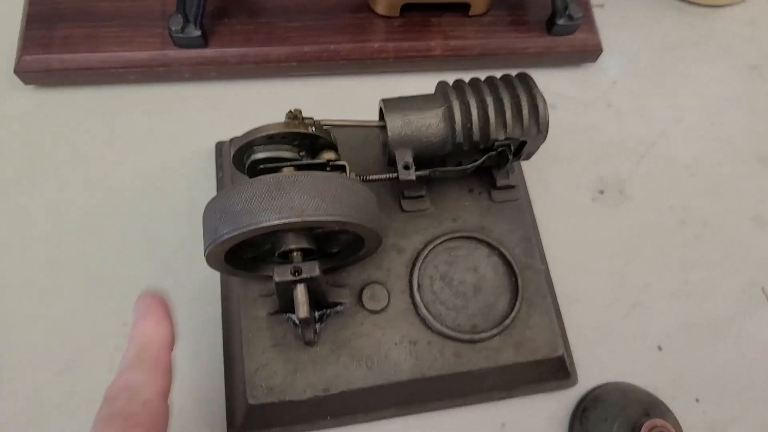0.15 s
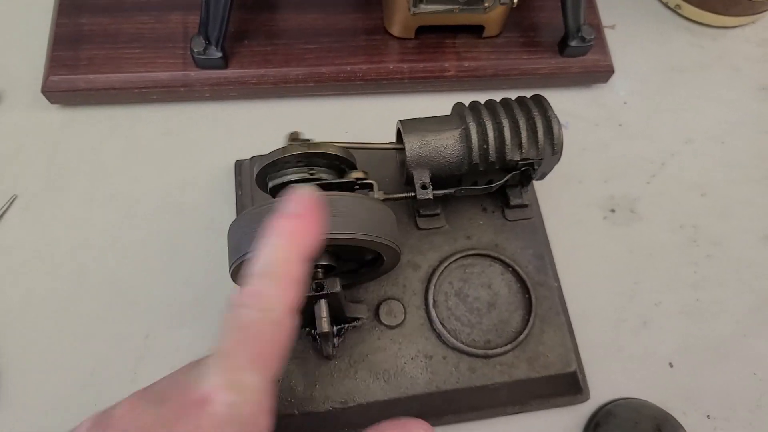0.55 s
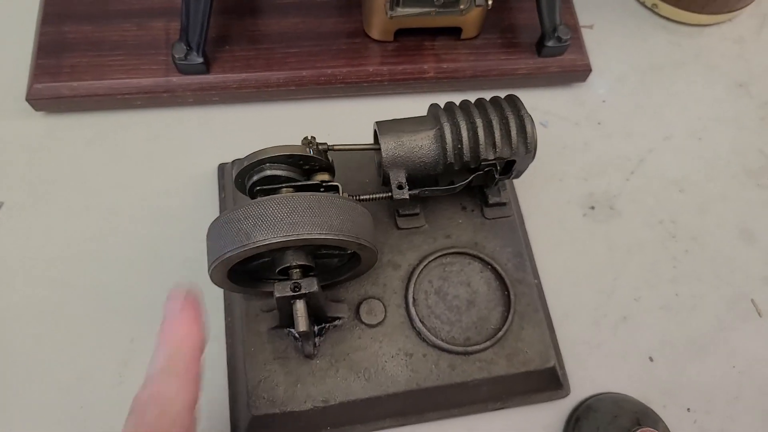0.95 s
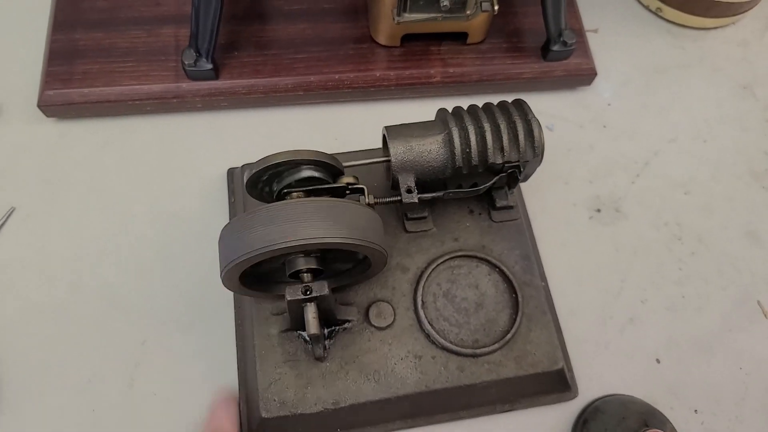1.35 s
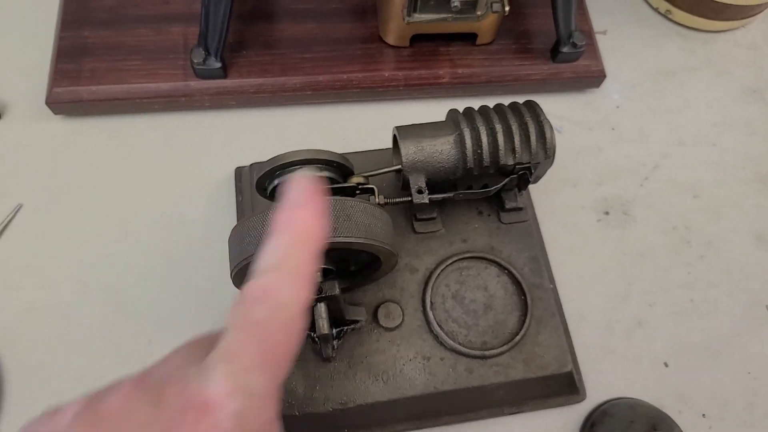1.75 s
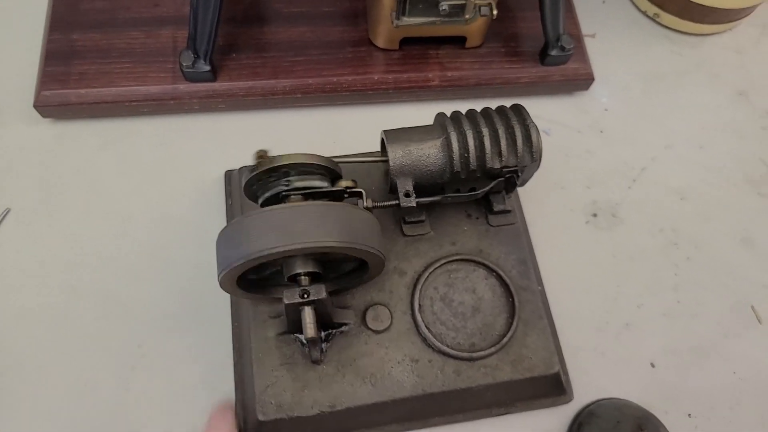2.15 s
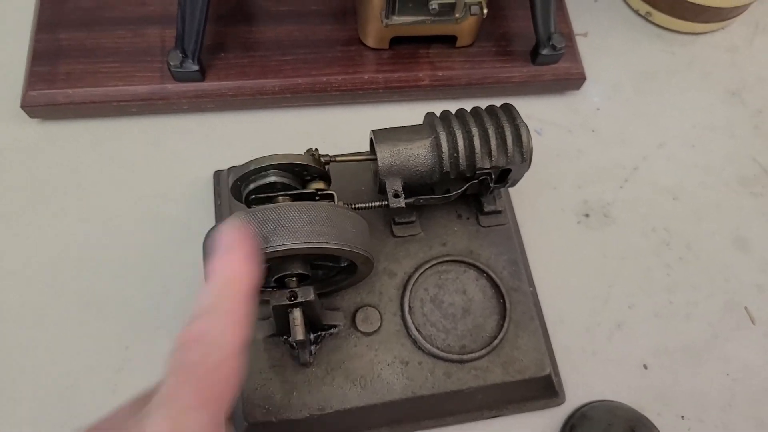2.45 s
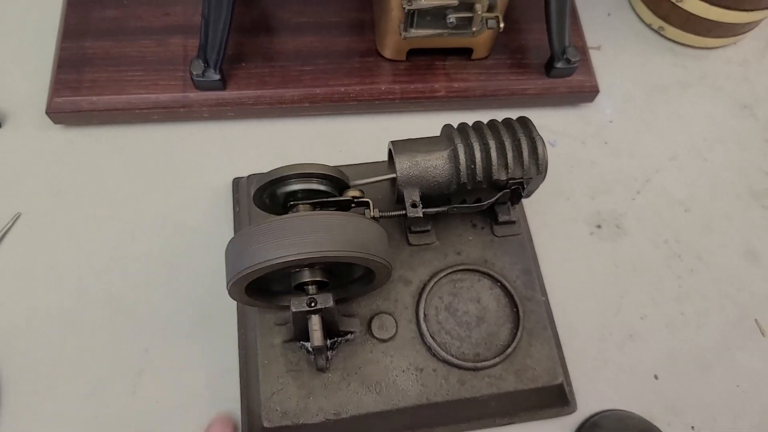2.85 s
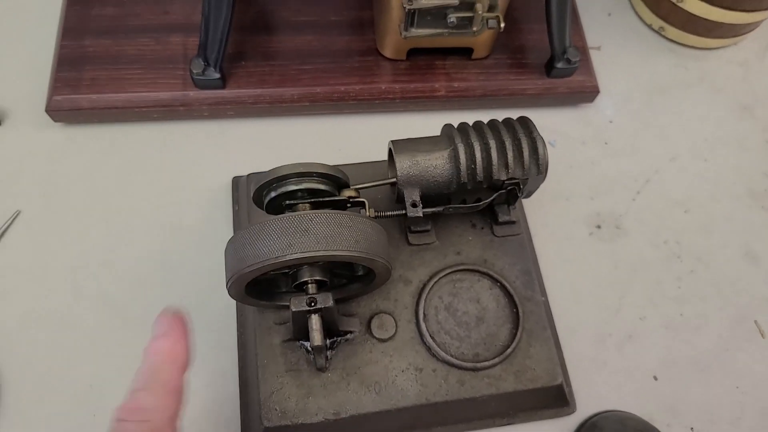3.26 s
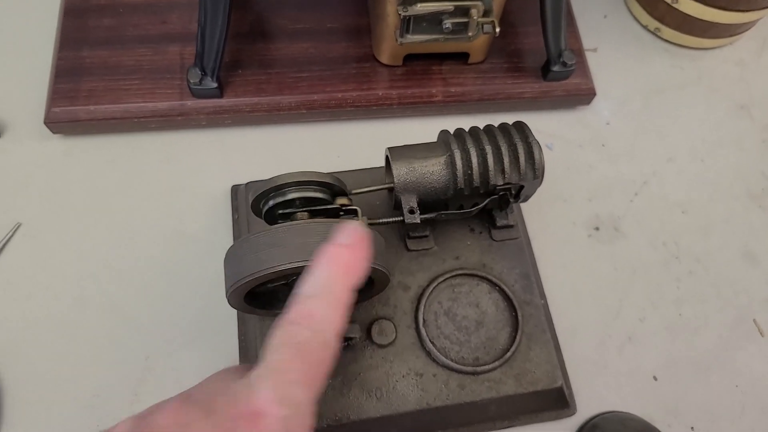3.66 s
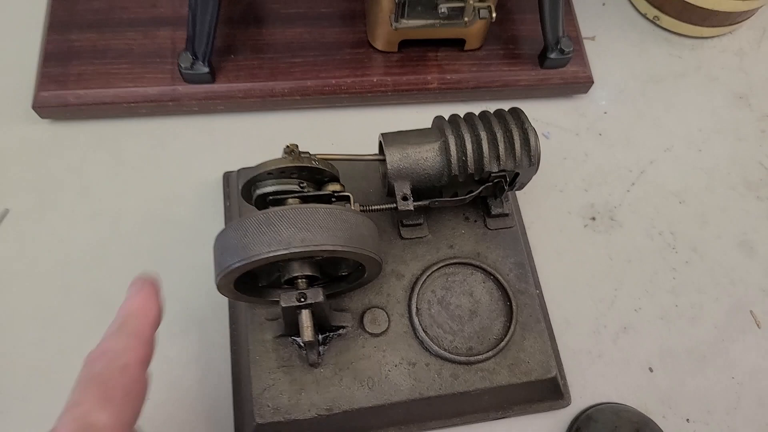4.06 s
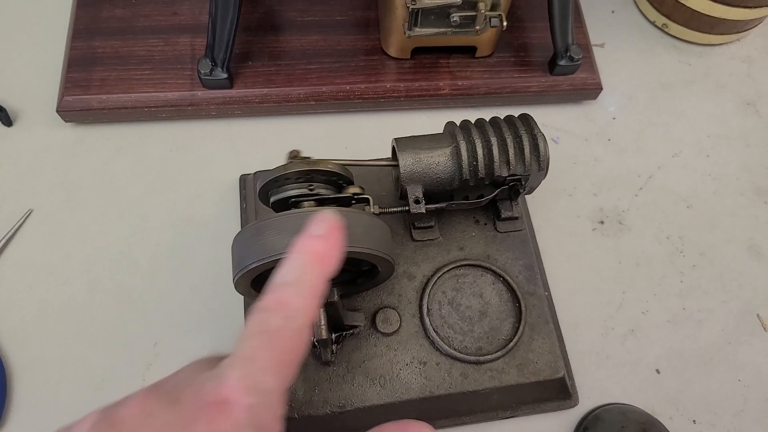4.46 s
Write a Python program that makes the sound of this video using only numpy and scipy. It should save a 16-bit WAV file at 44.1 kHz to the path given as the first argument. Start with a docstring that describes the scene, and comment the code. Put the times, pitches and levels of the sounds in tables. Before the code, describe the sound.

A small metal model engine, flicked by hand, gives a few hollow pops and sharp metallic clicks with short rings.

```python
"""A small, cold model vacuum engine gives hollow pops as a finger flicks its flywheel round.
Each pop is a puff of air that sets the cylinder ringing. The valve gear chatters and clacks, the metal
rings on, and loose joints tick as the wheel swings back. Skin brushes the ridged rim, the dry piston
rubs, and the base rocks on the table. A small room echoes it all, over a low rumble and a thin hiss."""
import sys
import numpy as np
from scipy import signal
from scipy.fft import rfft, irfft, next_fast_len
from scipy.io import wavfile

SR = 44100
rng = np.random.default_rng(int(sys.argv[2]) if len(sys.argv) > 2 else 0)


def master_out(mix):
    """Clip the mix to full scale and print it as 16-bit PCM to the path in sys.argv[1]."""
    frames = np.transpose(np.atleast_2d(mix))
    ceiling = np.clip(frames, -1, 1)
    pcm = np.round(ceiling * 32767).astype(np.int16)
    wavfile.write(sys.argv[1], SR, pcm)


N = 203197
TIME = np.arange(N) / SR


def amp(db):
    """Turn decibels into a number to multiply by."""
    return 10 ** (np.asarray(db) / 20)


def panned(db):
    """Left and right gains; a positive pan makes the left side louder."""
    return amp(np.array([[.5], [-.5]]) * db)


def at_hz(table, hz, column=1):
    """Read between a table's rows, spacing the frequencies by octaves."""
    table = np.array(table)
    return np.interp(np.log(np.maximum(hz, 1)), np.log(table[:, 0]), table[:, column])


def add(out, s, sound):
    """Mix a short sound in at s seconds."""
    start = int(np.clip(s * SR, 0, N - 1))
    out[:, start:start + sound.shape[1]] += sound[:, :N - start]


def white_noise(alike, size):
    """Stereo noise whose two sides are unrelated (alike=0) up to identical (alike=1)."""
    mid, side = rng.standard_normal((2, size))
    return np.sqrt((1 + alike) / 2) * mid + np.sqrt((1 - alike) / 2) * side * [[1], [-1]]


# Where the engine's hissy sounds sit between left and right: f/Hz, pan/dB
TREBLE_PAN = [(1500, -13), (3000, 1.5), (5000, 3), (7500, 12), (16000, 10)]
def noise(spectrum, alike, pan=None):
    """Steady stereo noise of strength 1, with its tone shaped by a table."""
    size = next_fast_len(N)
    hz = np.fft.rfftfreq(size, 1 / SR)
    gain = amp(at_hz(spectrum, hz)) * (panned(at_hz(pan, hz)) if pan else 1)
    shaped = irfft(rfft(white_noise(alike, size)) * gain, size)[:, :N]
    return shaped / shaped.std()


def wander(per_s):
    """A random curve around zero that glides to a new value so many times a second."""
    return np.interp(TIME * per_s, np.arange(5000), rng.standard_normal(5000))


def burst(s, rise, t60):
    """A loudness curve that swells to 1 at time s, then fades by 60 dB in t60 seconds."""
    return amp(-60 * np.minimum(np.maximum((s - TIME) / rise, (TIME - s) / t60), 2))


def ring(tones, contact=.0001, size=SR // 3):
    """A struck object rings with fading tones; a longer contact (in seconds) softens the start."""
    t = TIME[:size]
    sound = 0
    for k, (hz, db, t60, pan) in enumerate(tones):
        fade = amp(db + rng.standard_normal() - 60 * t / t60)
        sound += (-1) ** k * panned(pan) * fade * np.sin(2 * np.pi * hz * t)
    return (1 - np.exp(-(t / contact) ** 2)) * sound


# Tone of the low rumble: f/Hz, level/dB
RUMBLE = [(15, -37), (25, 0.5), (81, 3), (214, -9.5), (265, -10), (781, -29.5), (1000, -38), (1300, -62),
          (2200, -120)]
# Tone of the thin hiss: f/Hz, level/dB
THIN_HISS = [(900, 5), (1300, 5.5), (2300, -3), (3400, 2), (4000, -10.5), (4900, -8.5), (5600, -2.5),
             (6400, -19.5), (8000, -30), (13000, -20), (16000, -20.5)]
def background(rumble_db=-58, wander_db=5, hiss_db=-67.5):
    """A quiet rumble wavers under a steady, thin hiss."""
    rumble = amp(rumble_db + wander_db * wander(per_s=9)) * noise(RUMBLE, alike=.97)
    return rumble + amp(hiss_db) * noise(THIN_HISS, alike=.2)


# Low notes that linger between the walls: f/Hz, level/dB, t60/s, pan/dB
ROOM_TONES = [(84.3, -59, 0.22, 0.19), (102.6, -60, 0.88, 0.053), (137.3, -51.5, 0.23, 0.15),
              (182.6, -53.5, 0.36, 0.58), (245, -55.5, 0.26, 0.0086), (275.5, -56.5, 0.26, 0.94),
              (392, -65.5, 0.38, 0), (535, -68, 0.076, 0.09)]
# Echoes from nearby walls: delay/s, level/dB
ECHOES = [(.0072, -14), (0.0128, -12), (0.0201, -12.5)]
# The wash of later echoes: f/Hz, level/dB, t60/s, left-right likeness (0 to 1)
ROOM_TAIL = [(81.5, -18, 0.64, 1), (175, -6.5, 0.9, 0.99), (277, -18, 0.3, 0.61), (538.6, 0, 0.17, 0.35),
             (1048, -13, 0.44, 0.24), (2160, -6.5, 0.21, .05), (3972, -6.5, 0.16, .05),
             (8100, -5.5, 0.11, .05), (15000, -4.5, 0.084, .05)]
def room(sound, build_s=.0059):
    """The walls add low notes, a few dull echoes and a tail that fades at its own pace in each band."""
    t = TIME[:SR]
    response = ring(ROOM_TONES, size=SR)
    for delay, db in ECHOES:
        response[:, int(delay * SR)] += amp(db)
    response = signal.sosfilt(signal.butter(2, 1500, fs=SR, output="sos"), response)
    onset = 1 - np.exp(-(t / build_s) ** 2)
    edges = np.geomspace(50, 18000, 18)
    for low, high in zip(edges, edges[1:]):
        db, t60, alike = (at_hz(ROOM_TAIL, np.sqrt(low * high), column) for column in (1, 2, 3))
        bandpass = signal.butter(2, [low, high], "band", fs=SR, output="sos")
        band = signal.sosfilt(bandpass, white_noise(alike, SR))
        scale = np.sqrt(2 * np.log(1000) / (t60 * SR))   # a longer tail gets no extra energy
        response += band * amp(db - 60 * t / t60) * scale * onset
    return sound + signal.fftconvolve(sound, response, axes=1)[:, :N]


# The base hits the table: t/s, sway level/dB, knock level/dB
THUDS = [(0.003, -27.5, -53), (0.3, -37, -68), (0.473, -26.5, -38.5), (2.173, -26.5, -43.5),
         (2.545, -39, -74), (2.743, -10.5, -24.5), (3.799, -33.5, -54.5)]
# Deep tones of the swaying base: f/Hz, level/dB, t60/s, pan/dB
BASE_SWAY = [(31.8, -11, 0.21, 0), (59, -13, 0.013, 0.011), (82, 0, 0.077, 0.00062),
             (123, -6.5, 0.079, 0.0043), (169.8, -0.5, 0.12, 0.013)]
# Higher tones of its knock: f/Hz, level/dB, t60/s, pan/dB
BASE_KNOCK = [(300, 3, 0.13, 2.5), (424.2, 1, 0.17, -1), (560, 6, 0.035, -4.5), (715, 3, 0.03, -2)]
def thuds(sway_db=-3, rock_db=-31, loss_db=14, soft_db=-22):
    """The heavy base knocks on the table, and rocks back softly twice after each pop."""
    out, rocks = np.zeros((2, N)), []
    for s, db, _, period in POPS:
        for k in range(2):
            level_db = db + rock_db - k * loss_db
            rocks.append((s + (k + 1) * period, level_db, level_db + soft_db))
    for s, db, knock_db in THUDS + rocks:
        add(out, s, amp(db + sway_db) * ring(BASE_SWAY, contact=.0017))
        add(out, s, amp(knock_db) * ring(BASE_KNOCK, contact=.0015))
    return out


# Long tones of the engine's metal body: f/Hz, level/dB, t60/s, pan/dB
BODY_TONES = [(1030, -13.5, 0.067, -4), (1094, -9.5, .3, -6), (1160, -8.5, 0.096, -4.5)]
# Its many crowded tones, which blur into noise: f/Hz, level/dB
BODY_BLUR = [(300, -12.5), (700, 4.5), (1100, 3), (1600, -3), (2500, -4.5), (3600, -11), (5000, -36),
             (9000, -28.5)]
def body_ring(tones_db=-23.5, earlier_db=-51.5, clack_db=-17):
    """Pops and clacks set the metal body ringing; at the start it still rings from an earlier turn."""
    out = np.zeros((2, N))
    for s, db, *_ in POPS + CLACKS:
        add(out, s, amp(db + tones_db) * ring(BODY_TONES, contact=.002))
    blows = [(0, earlier_db)] + [(s, db) for s, _, db, _ in POPS]
    blows += [(s, db + clack_db) for s, _, db, _ in CLACKS]
    blur = sum(amp(db) * burst(s + .002, rise=.0075, t60=.35) for s, db in blows)
    return out + blur * noise(BODY_BLUR, alike=.18)


# Clear, high tones of the metal: f/Hz, level/dB, t60/s, pan/dB
PINGS = [(2185, -1, 0.28, -3), (2765, -12, 0.17, 1), (3165, -13.5, .22, 3.5), (6180, -15.5, 0.14, -7),
         (6300, -14, .13, -2), (7354, -11.5, 0.054, 7)]
def pings(clack_db=-36, chatter_db=-24, loss_db_per_octave=19):
    """Clacks and chatter make the metal ping; chatter pitched far from the lowest tone does so less."""
    out = np.zeros((2, N))
    for s, db, *_ in CLACKS:
        add(out, s, amp(db + clack_db) * ring(PINGS))
    for s, db, hz, _, length in CHATTER:
        octaves_away = abs(np.log2(hz / PINGS[0][0]))
        add(out, s + length, amp(db + chatter_db - loss_db_per_octave * octaves_away) * ring(PINGS))
    return out


# The finger flicks the wheel: t/s, brush level/dB, push level/dB
FLICKS = [(0.5392, -37, -21), (1.224, -38, -15.5), (2.0175, -35.5, -16), (2.7123, -34.5, -21),
          (3.68, -39.5, -27), (4.5138, -37, -22)]
# Tone of skin rubbing the rim: f/Hz, level/dB
SKIN = [(800, 5.5), (2500, 5), (4500, 7.5), (6000, -1.5), (8000, -5.5), (10000, -4.5), (13000, 1.5),
        (16000, 5.5)]
def finger_brushes(skin_db=-2.5, touch_db=-27, catch_db=7, grain_db=4, squeak_hz=5800, squeak_db=-34):
    """Skin catches on the ridged rim, then slips in jerks; the push sways the base and squeaks faintly."""
    out, stroke, touch, drag = np.zeros((2, N)), 0, 0, 0
    for s, db, push_db in FLICKS:
        stroke += amp(db + skin_db) * burst(s + .0044, rise=.011, t60=.026)
        touch += amp(db + touch_db) * burst(s, rise=.19, t60=.026)
        drag += amp(push_db + squeak_db) * burst(s + .018, rise=.06, t60=.037)
        add(out, s + .0028, amp(push_db) * ring(BASE_SWAY, contact=.017))
    narrow = signal.iirpeak(squeak_hz, Q=40, fs=SR)
    squeak = signal.lfilter(*narrow, white_noise(.98, N))
    squeak = signal.lfilter(*narrow, squeak)   # filtering twice gives a purer note
    skin = stroke * amp(grain_db * wander(per_s=700)) + touch * amp(catch_db * wander(per_s=250))
    return out + skin * noise(SKIN, .55, TREBLE_PAN) + drag * squeak / squeak.std()


def piston_rub(rub_db=-21, firm_push_db=-12.5, firm_travel_s=.011, catch_db=6):
    """The dry piston catches and slips after each flick; a weak push makes it slower and fainter."""
    friction = 0
    for s, db, push_db in FLICKS:
        speed_db = push_db - firm_push_db
        travel = firm_travel_s / amp(speed_db)   # time to reach full speed
        friction += amp(db + rub_db + .22 * speed_db) * burst(s + travel, 5 * travel, 2 * travel)
    return friction * amp(catch_db * wander(per_s=130)) * noise(HISS, .5, TREBLE_PAN)


# Tones of the connecting rod: multiple of the pitch, level/dB, multiple of t60, pan/dB
ROD = [(0.359, -17, 1.8, -3), (0.52, -17, 1.5, 0.5), (1, -2.5, 1, -6.5), (1.2, -13, 0.9, -5.5),
       (1.401, -9.5, .6, -6)]
def rod_knock(hz, contact, t60=.014):
    """One knock on the connecting rod, quickly hushed by its joints."""
    tones = [(hz * ratio, db, t60 * share, pan) for ratio, db, share, pan in ROD]
    return ring(tones, contact, size=SR // 10)


# Loose joints tick: t/s, level/dB, f/Hz, treble level/dB
TICKS = [(0.1038, -51.5, 1560, -80.5), (0.187, -57, 1267, -72), (0.37, -36, 1394, -60.5),
         (0.4753, -47.5, 1760, -77), (0.7203, -38, 1340, -72), (0.9147, -65, 1267, -82),
         (1.069, -38.5, 1573, -79.5), (1.1132, -28.5, 1526, -74), (2.1717, -33, 1680, -47),
         (2.2767, -49, 1170, -86), (2.5813, -34, 1494, -64), (3.6422, -35, 1383, -55.5),
         (3.8023, -40, 2087, -62), (3.8099, -47.5, 2406, -50), (4.3542, -36, 1786, -62)]
# Tone of their dry rattle: f/Hz, level/dB
RATTLE = [(400, -13), (900, 5), (1600, 4), (2600, -2.5), (3800, -1.5), (5500, -5), (9000, -25.5)]
def joint_ticks(rod_db=5.5, rattle_db=-3, click_db=8, bounce_cycles=4, bounce_db=-3):
    """Loose joints bounce in step with the ringing rod; harder, sharper ticks rattle more."""
    out, rattle, click = np.zeros((2, N)), 0, 0
    for s, db, hz, treble_db in TICKS:
        for k in range(3):
            force = amp(db + rod_db + k * k * bounce_db)
            add(out, s + k * bounce_cycles / hz, force * rod_knock(hz, contact=.001))
        rattle += amp((db + treble_db) / 2 + rattle_db) * burst(s + .002, rise=.0045, t60=.073)
        click += amp(treble_db + click_db) * burst(s + .0035, rise=.0071, t60=.0053)
    return out + rattle * noise(RATTLE, .517) + click * noise(HISS, .6, TREBLE_PAN)


# The roller chatters: t/s, level/dB, f/Hz, treble level/dB, length/s
CHATTER = [(0.569, -20, 1420, -31.5, 0.012), (1.344, -15.5, 2158, -31, 0.0086),
           (2.008, -30.5, 1425, -49, 0.0096), (2.018, -30, 1755, -46.5, .012),
           (4.545, -19.5, 1730, -27, 0.0079)]
# Tones of the small metal links: f/Hz, level/dB, t60/s, pan/dB
LINKS = [(2630, -3, 0.054, 1.5), (3300, -9.5, 0.022, 5.3), (3983, -13.5, 0.0061, 13),
         (4800, -5, 0.006, 0.5)]
def roller_chatter(link_db=-15, swell_db=6, hits=7):
    """A roller skips over the cam (the bump that works the valve), shaking the rod harder and harder."""
    out, grit = np.zeros((2, N)), 0
    for s, db, hz, treble_db, length in CHATTER:
        for progress in (np.arange(hits) + rng.random(hits)) / hits:
            when = s + length * progress
            force_db = swell_db * (progress - .5)
            add(out, when, amp(db + force_db) * rod_knock(hz, contact=.00088))
            add(out, when, amp(db + force_db + link_db) * ring(LINKS, contact=.00085, size=SR // 10))
            grit += amp(treble_db + force_db) * burst(when + .0019, rise=.0025, t60=.0016)
    return out + grit * noise(HISS, .52, TREBLE_PAN)


# The valve gear snaps over: t/s, level/dB, crack level/dB, multiple of the usual pitch
CLACKS = [(1.262, -15.5, -17, 0.98), (2.055, -7, -14, 1.019), (2.747, -11.5, -15, 0.963)]
# Tones of the valve gear: f/Hz, level/dB, t60/s, pan/dB
VALVE_GEAR = [(139.7, -24, 0.026, -0.5), (407, -8, 0.01, -1), (600, -22.5, 0.005, -2.5),
              (930, -8, 0.0094, -1), (1260, -6.5, 0.006, -7.5), (1617, -19.5, 0.0066, -22.5),
              (1944, -22, 0.0097, -17.5), (2670, -15, 0.004, -0.5), (3000, -26, 0.0072, 7.5),
              (4340, -27.5, 0.0047, -16)]
# Tone of the hard crack: f/Hz, level/dB
CRACK = [(800, 4.5), (2000, -0.5), (3500, 9), (5500, -0.5), (8000, -3.5), (12000, -11.5), (16000, 1)]
def valve_clacks(ring_db=11, rebound_s=.0033, rebound_db=-4, rattle_db=-3):
    """The valve gear cracks against its stop, rattles and bounces; how it lands shifts its pitch."""
    out, crack = np.zeros((2, N)), 0
    for s, db, crack_db, pitch in CLACKS:
        tones = [(hz * pitch, *rest) for hz, *rest in VALVE_GEAR]
        blow = amp(db + ring_db) * ring(tones, contact=.0002)
        add(out, s, blow)
        add(out, s + rebound_s, amp(rebound_db) * blow)
        snap = burst(s + .00043, rise=.0038, t60=.0028)
        rattle = amp(rattle_db) * burst(s + .0015, rise=.0012, t60=.0087)
        crack += amp(crack_db) * (snap + rattle)
    return out + crack * noise(CRACK, .6, TREBLE_PAN)


# The cylinder pops: t/s, puff level/dB, body ring level/dB, time between rocks of the base/s
POPS = [(0.5877, -3.5, -37, 0.19), (1.3529, -6, -47, .167), (2.804, -4.5, -87, 0.1),
        (4.562, -2.5, -30.5, .15)]
# Hollow tones of the cylinder: f/Hz, level/dB, t60/s, pan/dB
CYLINDER = [(476, -10.5, 0.016, -1), (643, -15, 0.035, -8.5), (1035, 1, 0.0094, -1.5),
            (1233.4, -14.5, 0.0073, -8), (2040, -25, 0.0064, 3.5)]
# Tone of escaping air, also used for rubbing and clicks: f/Hz, level/dB
HISS = [(800, -1), (2000, 3.5), (3500, 3), (5000, 1.5), (7000, -2), (10000, -5), (16000, -6.5)]
def cylinder_pops(puff_hz=335, ring_db=2, lead_s=.0014, hiss_db=-16, close_db=-1, jolt_db=-19):
    """A puff of air rings the cylinder and jolts the base; air hisses out and the valve shuts again."""
    out, leak = np.zeros((2, N)), 0
    spread = (np.pi * puff_hz * (TIME[:SR // 50] - 2 * lead_s)) ** 2
    puff = (2 * spread - 1) * np.exp(-spread)   # push, suck, push
    for s, db, _, _ in POPS:
        add(out, s - lead_s, amp(db) * puff * panned(0))
        add(out, s, amp(db + jolt_db) * ring(BASE_SWAY, contact=.0054))
        add(out, s + lead_s, amp(db + ring_db) * ring(CYLINDER, contact=.00048))
        escape = burst(s + lead_s / 2, rise=.012, t60=.019)
        closing = amp(close_db) * burst(s + .0058, rise=.0027, t60=.0099)
        leak += amp(db + hiss_db) * (escape + closing)
    return out + leak * noise(HISS, .48, TREBLE_PAN)


def scene(tick_room_share=.4):
    """The engine plays in the room, over the background; the small ticks stir the room least."""
    ticks = joint_ticks()
    engine = cylinder_pops() + valve_clacks() + pings() + body_ring() + roller_chatter()
    left, right = engine + tick_room_share * ticks + finger_brushes() + piston_rub() + thuds()
    late_right = np.pad(right, (3, 0))[:N]   # sound reaches the right side three samples later
    return room(np.array([left, late_right])) + (1 - tick_room_share) * ticks + background()


def record(dry, ceiling=.9, soften_hz=15000, cutoff_hz=16500):
    """Round off the loudest peaks, soften the highest treble and cut what lies above it."""
    rounded = dry / (1 + (dry / ceiling) ** 4) ** .25
    softened = signal.sosfilt(signal.butter(6, soften_hz, fs=SR, output="sos"), rounded)
    return signal.sosfilt(signal.ellip(10, .1, 80, cutoff_hz, fs=SR, output="sos"), softened)


dry = scene()
out = record(dry)
master_out(out)
```